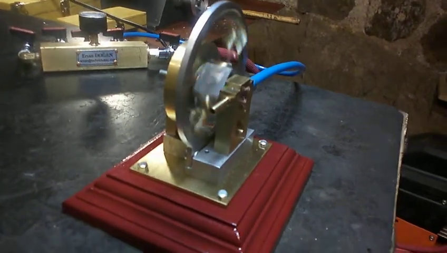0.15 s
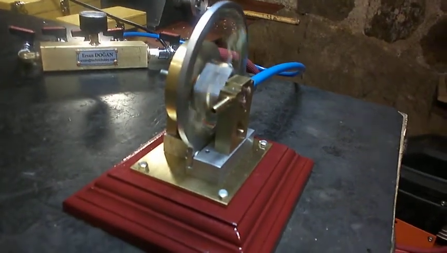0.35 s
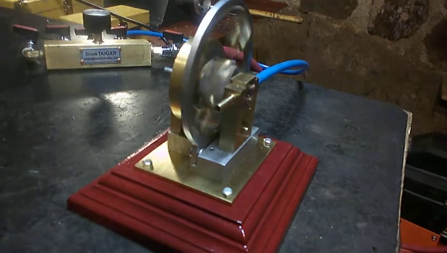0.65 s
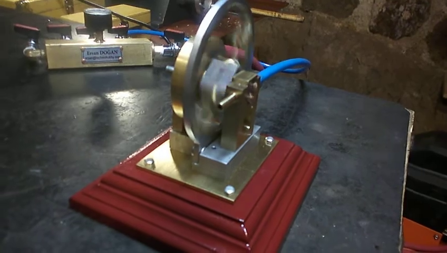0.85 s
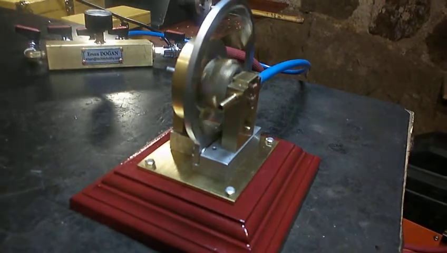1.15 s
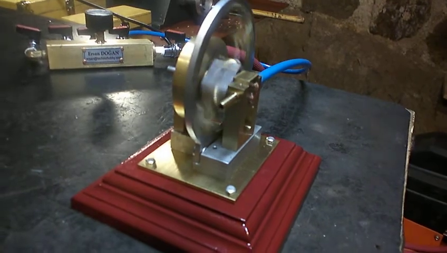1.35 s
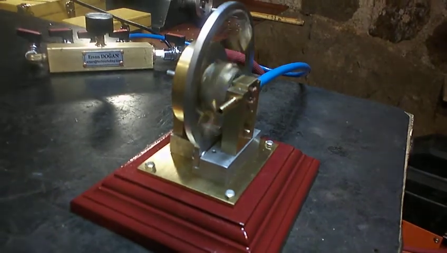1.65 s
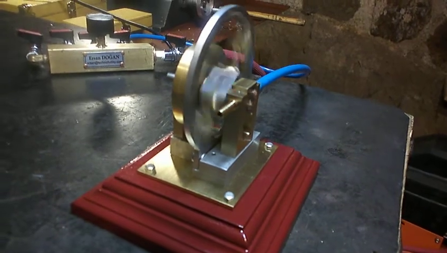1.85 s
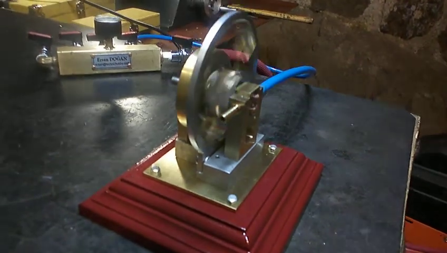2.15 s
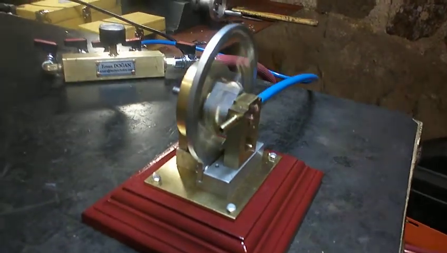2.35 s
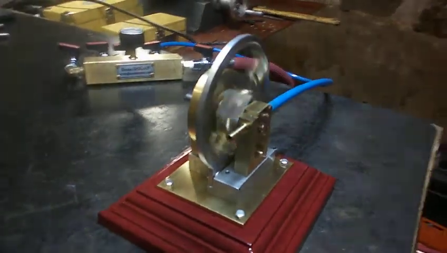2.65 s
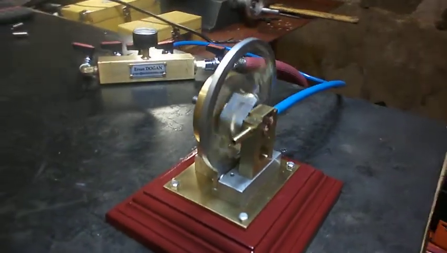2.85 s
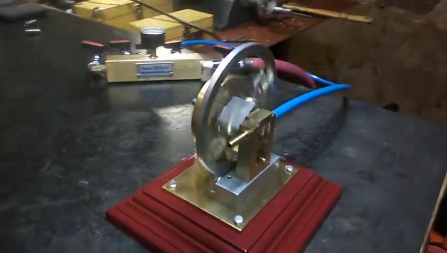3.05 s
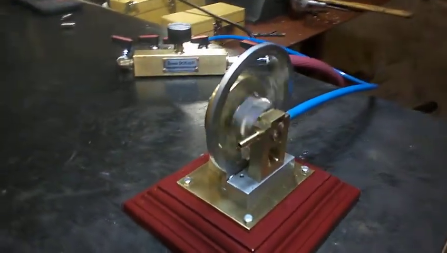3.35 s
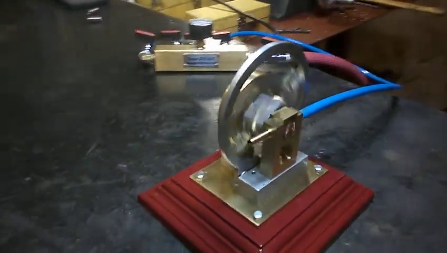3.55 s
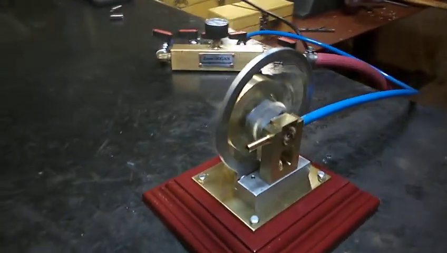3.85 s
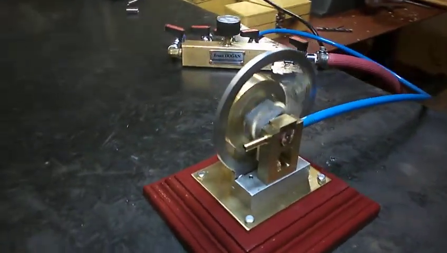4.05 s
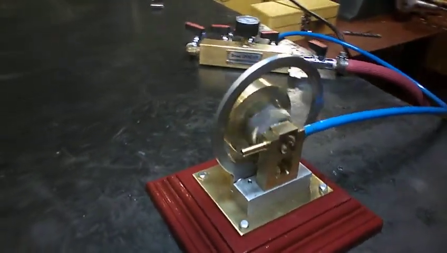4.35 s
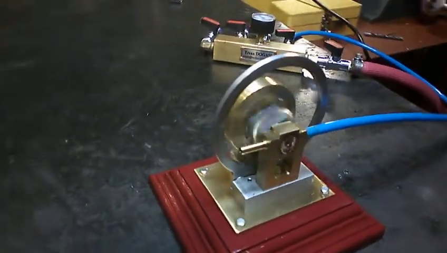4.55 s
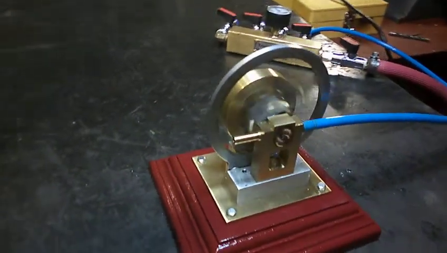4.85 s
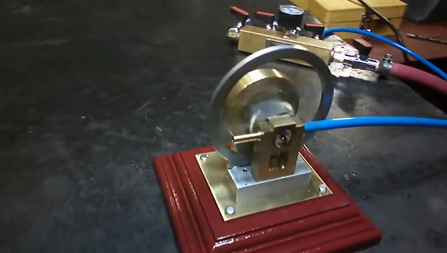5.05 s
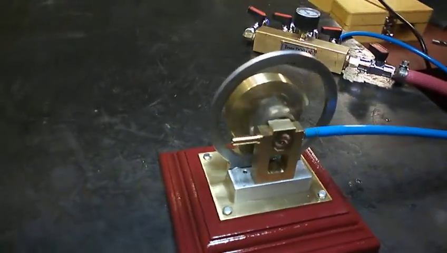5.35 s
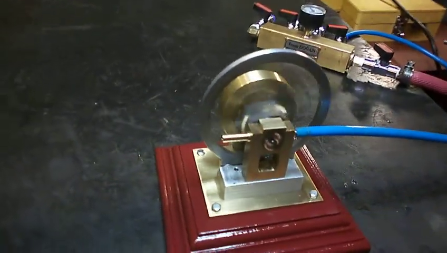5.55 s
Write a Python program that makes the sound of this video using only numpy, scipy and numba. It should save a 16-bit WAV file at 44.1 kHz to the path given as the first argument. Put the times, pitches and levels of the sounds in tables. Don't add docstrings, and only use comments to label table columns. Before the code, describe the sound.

Already running at the start and never stopping, a small air engine clatters at a steady eight turns a second: hard metal clack, ticking linkage, two breathy air puffs per turn. The camera moves from the wheel towards the cylinder, so taps and metal ring change slightly while the pace holds. Close, dry, band-limited sound over a faint workshop rumble.

```python
import sys
import numpy as np
from scipy import signal
from scipy.fft import rfft, irfft, next_fast_len
from scipy.io import wavfile
from scipy.ndimage import uniform_filter1d
from numba import njit

SR = 44100
rng = np.random.default_rng(int(sys.argv[2]) if len(sys.argv) > 2 else 0)


def elevation(decibels):
    levels = np.asarray(decibels, float)
    return 10 ** (levels / 20)


def store_pcm(level_fs):
    pcm = np.round(np.clip(level_fs, -1, 1) * 32767).astype(np.int16)
    wavfile.write(sys.argv[1], SR, np.atleast_2d(pcm).T)


N = 251811

# time_s, turns_done
CRANK = [(.1054, 0), (.7332, 5), (1.3602, 10), (1.484, 11), (1.8592, 14), (2.355, 18), (2.4784, 19),
         (2.8519, 22), (3.1032, 24), (3.477, 27), (3.8533, 30), (4.1063, 32), (5.3656, 42), (5.6233, 44)]
# time_s, nearness_db, bearing (0 facing the wheel, 1 facing the cylinder)
CAMERA = [
    (0, 0.47, 0.11),
    (1.199, 0.56, 0.031),
    (2.402, 0.85, 0.18),
    (3.499, 0.5, 0.34),
    (4.6, 0.25, 0.59),
    (5.71, 0.05, 0.74),
]

# base_db, plate_db, cylinder_db, wheel_db, rattle_ms
KNOCK = [
    (10.5, 11.5, 17.6, 23.5, 0.1),
    (-19.5, -7.5, 15.6, 8, 0.84),
    (0.5, 1, 5.4, 4, 0.19),
    (-3.5, -7, 7.8, 13.5, 0.57),
]
KNOCK_DELAY_MS = [.4, 2.0, 3.8, 5.3]
KNOCK_LOOSE = [.12, .3, .5, .8]
KNOCK_SPREAD_MS = [0, .02, .12, .2]
# base_db, plate_db, cylinder_db, wheel_db
KNOCK_BEARING_DB = [0, 0, 4, -2]

# base_db, plate_db, cylinder_db, wheel_db, rattle_ms
QUARTER_TAPS = [(-30, -39, -10.5, -17, 0.81), (-9.5, -16, -19, -19, 1.2), (-2.5, -25, -14, -9.5, 0.43),
                (-36.5, -19.5, -22, -14.5, 0.79)]
HALF_TAPS = [(-5.5, -23, -23.5, -16.5, 3), (-1.5, -28, -28.5, -10.5, 0.93), (-19.5, -22.5, -32, -14.5, 3.3),
             (-29, -40.5, -11.5, -13.5, 4.1)]
THREE_QUARTER_TAPS = [(-25, -30, -9, -20.5, 3.9), (-11, -18, -12.5, -8.5, 1.5), (-32.5, -18, -9.5, -7, 4),
                      (-31.5, -14, -11.5, -13, 3.2), (-18.5, -31, -30, -20, 2.8),
                      (-28, -23.5, -32, -36.5, 0.57)]
TAP_SHARES = [
    [.195, .238, .252, .312],
    [.455, .468, .506, .575],
    [.705, .745, .775, .812, .868, .922],
]
STROKE_DB = [-0.2, -1.5, -0.76]
STROKE_SCATTER_DB = [0.1, 1.3, 1.3]

# pitch_hz, level_db, t60_s, first_swing_side
BASE = [(370, -33, 0.014, -1), (624, -34.5, 0.013, -1)]
PLATE = [(1560, -15, .012, -1), (1880, -21.5, .012, 1), (2220, -10.5, .011, 1), (2500, -28, .016, -1)]
CYLINDER = [(2756, -26.5, 0.018, -1), (3038, -24.5, 0.01, 1), (3377, -20, 0.019, -1)]
WHEEL = [(1326, -25, 0.0091, -1), (4170, -31.5, 0.019, 1), (4529, -16.5, 0.0084, 1), (5192, -19, 0.017, -1),
         (6110, -22, 0.0082, 1), (6710, -24.5, 0.011, -1), (7234, -32.5, 0.014, 1)]
HOLLOW = [(735, -42, 0.024, 1), (789, -31.5, 0.033, 1)]
ROD_LOW = [(1787, -25, 0.0089, 1)]
ROD_HIGH = [(5330, -29.5, 0.019, 1), (5470, -25, 0.0088, -1)]
PARTS = (BASE, PLATE, CYLINDER, WHEEL, HOLLOW, ROD_LOW, ROD_HIGH)
# pitch_hz, level_db, t60_s, first_swing_side, part_number
FRAME = [(*mode, part) for part, modes in enumerate(PARTS) for mode in modes]
PART_DB = [.4, 1.09, 0.25, 1.8, 2, 1.9, 3]
PART_BEARING_DB = [-1.14, -0.35, 5, 0.95, 0, 5.5, 3.94]

# opens_share of turn, opening_share, stays_open_share, dies_db per turn
EXHAUST = (0.888, 0.017, 0.42, 143)
INLET = (0.4205, 0.066, .37, 320)
# jet_db, pipe_db, pipe_hz at opening, fall_hz per turn, pipe_lag_share (added to
# opening_share; the inlet's negative sum keeps its pipe nearly shut), sag_db per turn (negative rises)
EXHAUST_AIR = (-35.5, -28.5, 4450, 1500, .07, 8)
INLET_AIR = (-33.5, -31, 3751, 701.5, -1.9, -28)
AIR_DB = [4, 4, 1]
AIR_BEARING_DB = [-0.2, -4.5, 1.3]
# freq_hz, level_db
JET = [(300, -25), (700, -28.5), (1000, -31), (1700, 5.5), (2200, 0.5), (2800, -7), (3500, 4.5), (5200, -7),
       (5800, -6.5), (6900, 1.5), (7600, -7)]

# freq_hz, level_db
SHOP = [(15, -60.5), (25, -50), (118, -11.5), (241, -14), (328, -8), (484, -10.5), (534, 1.5), (598, -24.5),
        (775, -5), (941, -6), (1200, 1.5), (1560, -22), (2640, -120)]

# freq_hz, level_db
MIC_BASS = [(20, -35), (60, 3), (150, 0), (400, 0)]
# freq_hz, level_db
CAMERA_TOP = [(7300, -3), (7600, -1.5), (7780, -13), (8000, -20)]
# freq_hz, width_hz
CAMERA_NOTCHES = [(3935, 40), (5220, 40), (5905, 40), (7870, 60)]
# freq_hz, level_db
MIRROR_LEAK = [(7600, -3), (8000, -13.5), (8500, -17.5), (8800, -29), (9100, -44.5), (9500, -62)]


def mechanism():
    turn_s = turns()
    force = np.zeros((len(FRAME), N + SR))
    crank_knock(force, turn_s)
    linkage_taps(force, turn_s)
    out = 0
    for push, (hz, db, t60, side, _) in zip(force, FRAME):
        pole = np.exp(2j * np.pi * hz / SR - np.log(1000) / (t60 * SR))
        ring = signal.lfilter([1], [1, -pole], push[:N]).imag
        out = out + np.sign(side) * elevation(db) * ring
    return signal.sosfilt(signal.butter(2, 220, "high", fs=SR, output="sos"), out)


def turns():
    s, done = np.transpose(CRANK)
    s = np.interp(np.arange(done[-1] + 1), done, s)
    return np.r_[2 * s[0] - s[1], s, 2 * s[-1] - s[-2]]


def crank_knock(force, turn_s):
    treble_db = -11 + 0.6 * rng.standard_normal(len(turn_s))
    treble_db = np.outer(treble_db, [0, 0, 1, 1])
    view_db = np.outer(bearing_at(turn_s), KNOCK_BEARING_DB)
    for delay_ms, loose, spread_ms, blow in zip(KNOCK_DELAY_MS, KNOCK_LOOSE, KNOCK_SPREAD_MS, KNOCK):
        *parts_db, rattle_ms = blow
        db = -8.5 + np.array(parts_db) + treble_db + view_db
        strike(force, turn_s + delay_ms / 1000, db, rattle_ms, loose, hollow_db=-8, rod_db=-14,
               jitter_ms=spread_ms, scatter_db=.35, colour_db=1.1)


def linkage_taps(force, turn_s):
    period = np.diff(turn_s)
    groups = (QUARTER_TAPS, HALF_TAPS, THREE_QUARTER_TAPS)
    hollow = (-14, -10, 11)
    for shares, group, level_db, spread_db, hollow_db in zip(
            TAP_SHARES, groups, STROKE_DB, STROKE_SCATTER_DB, hollow):
        stroke_db = level_db + spread_db * rng.standard_normal(len(period))
        for share, (*parts_db, rattle_ms) in zip(shares, group):
            db = stroke_db[:, None] + parts_db
            strike(force, turn_s[:-1] + share * period, db, rattle_ms, loose=1.1, hollow_db=hollow_db,
                   rod_db=5.5, jitter_ms=.25, scatter_db=.7, colour_db=.9)


def strike(force, at_s, parts_db, rattle_ms, loose, hollow_db, rod_db, jitter_ms, scatter_db, colour_db):
    span = np.arange(400)
    count = len(at_s)
    late_s = jitter_ms / 1000 * rng.standard_normal(count)
    start = np.round((at_s + late_s) * SR).astype(int)

    habit = rng.standard_normal(len(span))
    fresh = rng.standard_normal((count, len(span)))
    length = max(rattle_ms, .02) * SR / 1000
    fade = np.exp(-span / length) / np.sqrt(length / 2)
    rattle = loose * (.6 * habit + .8 * fresh) * fade

    parts_db = np.column_stack([parts_db, parts_db[:, 0] + hollow_db, parts_db[:, [1, 3]] + rod_db])
    parts_db = parts_db + 2 * seen(at_s, PART_DB, PART_BEARING_DB)
    strength_db = scatter_db * rng.standard_normal(count)
    for m, (*_, part) in enumerate(FRAME):
        size = elevation(parts_db[:, part] + strength_db + colour_db * rng.standard_normal(count))
        blow = (span == 0) + (.12 if part in (0, 4) else 1) * rattle
        force[m, start[:, None] + span] += size[:, None] * blow


def air():
    t, turn_s = np.arange(N) / SR, turns()
    share = np.interp(t, turn_s, np.arange(len(turn_s))) % 1
    jet_out, pipe_out, out_hz = port(share, *EXHAUST, *EXHAUST_AIR)
    jet_in, pipe_in, in_hz = port(share, *INLET, *INLET_AIR)
    jet_db = 10 * np.log10(jet_out + jet_in)
    pipe_db = 10 * np.log10(pipe_out + pipe_in)
    pipe_hz = (pipe_out * out_hz + pipe_in * in_hz) / (pipe_out + pipe_in)
    view_jet_db, view_pipe_db, view_treble_db = seen(t, AIR_DB, AIR_BEARING_DB).T

    jet = unit(colour(rng.standard_normal(N), JET))
    treble = colour(jet, [(4800, -41.0), (5800, 6.5)])
    body = (jet - treble) * elevation(0.95 * walk(300))
    jet = body + treble * elevation(view_treble_db + 0.73 * walk(300))

    pipe = sweep(rng.standard_normal(N), pipe_hz * (1 + 0.0089 * walk(45)), 1500.0)
    pipe = unit(sweep(pipe, pipe_hz, 1500.0)) * elevation(0.56 * walk(200))

    flow_db = 0.28 * walk(30)
    return jet * elevation(jet_db + view_jet_db + flow_db) + pipe * elevation(pipe_db + view_pipe_db + flow_db)


def port(share, opens, opening, stays, dies_db, jet_db, pipe_db, hz, fall_hz, lag, sag_db):
    shut_db = -27
    since = (share - opens) % 1
    after_db = -dies_db * np.maximum(since - stays, 0)
    jet_open_db = shut_db * np.maximum(1 - since / opening, 0)
    pipe_open_db = shut_db * np.maximum(1 - since / (opening + lag), 0)
    jet_db = jet_db + after_db + jet_open_db
    pipe_db = pipe_db + after_db + pipe_open_db - sag_db * np.minimum(since, stays)
    return elevation(2 * jet_db), elevation(2 * pipe_db), hz - fall_hz * since


@njit
def sweep(x, hz, width):
    y, band, low = np.empty(len(x)), 0., 0.
    for i in range(len(x)):
        g, k = np.tan(np.pi * hz[i] / SR), width / hz[i]
        v = (band + g * (x[i] - low)) / (1 + g * (g + k))
        band = 2 * v - band
        low = low + 2 * g * v
        y[i] = k * v
    return y


def bearing_at(t):
    s, _, bearing = np.transpose(CAMERA)
    return np.interp(t, s, bearing)


def seen(t, db, bearing_db):
    s, near_db, _ = np.transpose(CAMERA)
    return np.interp(t, s, near_db)[:, None] + db + np.outer(bearing_at(t), bearing_db)


def room(engine):
    t60_s, level_db = 0.65, -17.5
    t = np.arange(SR // 4) / SR
    tail = rng.standard_normal(len(t)) * elevation(-60 * t / t60_s) * (t > .003)
    tail *= elevation(level_db) / np.sqrt(np.sum(tail ** 2))
    return signal.fftconvolve(engine, tail)[:N]


def shop():
    level_db = -46.5 + walk(2) - 1.5 * bearing_at(np.arange(N) / SR)
    return unit(colour(rng.standard_normal(N), SHOP)) * elevation(level_db)


def colour(x, points):
    size = next_fast_len(len(x))
    hz, db = np.transpose(points)
    axis = np.log(np.fft.rfftfreq(size, 1 / SR) + 1)
    gain = elevation(np.interp(axis, np.log(hz), db))
    return irfft(rfft(x, size) * gain, size)[:len(x)]


def unit(x):
    return x / np.sqrt(np.mean(x ** 2))


def walk(rate):
    k = int(SR / rate)
    held = np.repeat(rng.standard_normal(N // k + 1), k)
    return unit(uniform_filter1d(uniform_filter1d(held, k), k)[:N])


def scene():
    engine = mechanism() + air()
    return (engine + room(engine) + shop())[None]


def low_pass(x):
    return signal.sosfilt(signal.butter(12, 9020, fs=SR, output="sos"), x)


def record(dry):
    camera_sr, peak = 16000, 0.89
    edge = camera_sr / 2
    x = colour(dry[0], MIC_BASS + CAMERA_TOP + [(edge + 1, -120)])
    x = peak * np.tanh(x / peak)
    x = colour(x, [(20, -22), (90, 0), (edge, 0), (edge + 1, -120)])
    for hz, width in CAMERA_NOTCHES:
        x = signal.lfilter(*signal.iirnotch(hz, hz / width, SR), x)
    mirror = 2 * x * np.cos(2 * np.pi * camera_sr * np.arange(N) / SR)
    x = signal.lfilter(*signal.iirnotch(edge, 400, SR), x + mirror)
    x = colour(x, MIRROR_LEAK + [(10500, -90)])
    return low_pass(x[None])


dry = scene()
out = record(dry)
store_pcm(out)
```